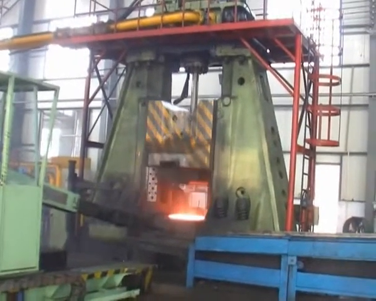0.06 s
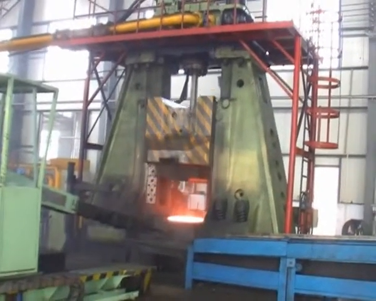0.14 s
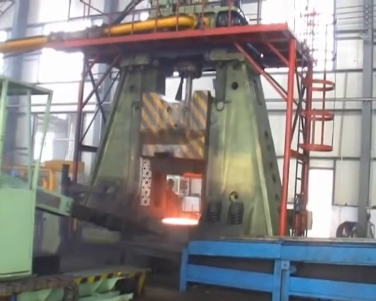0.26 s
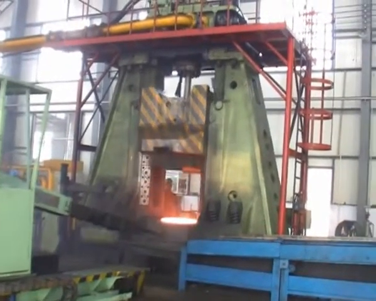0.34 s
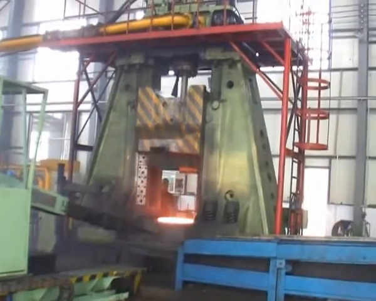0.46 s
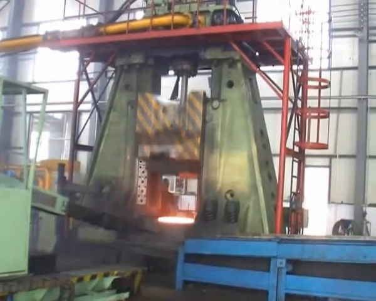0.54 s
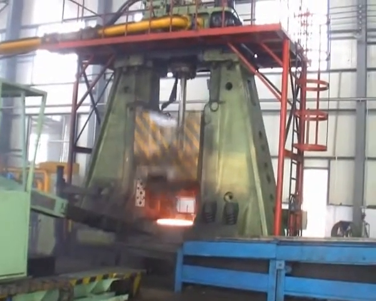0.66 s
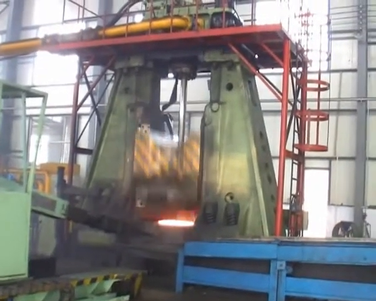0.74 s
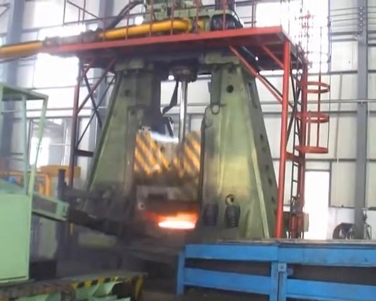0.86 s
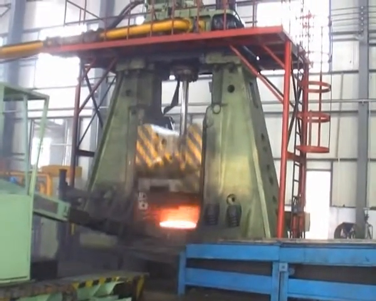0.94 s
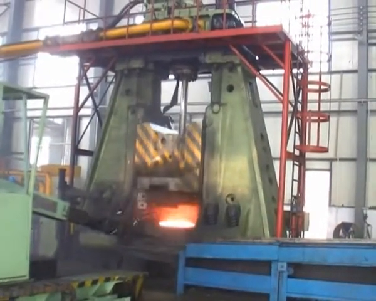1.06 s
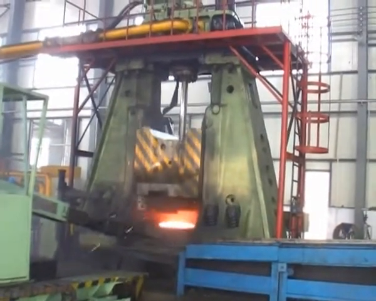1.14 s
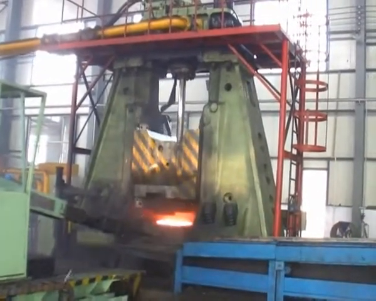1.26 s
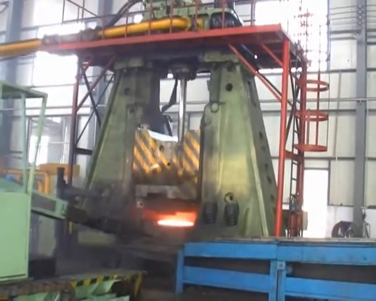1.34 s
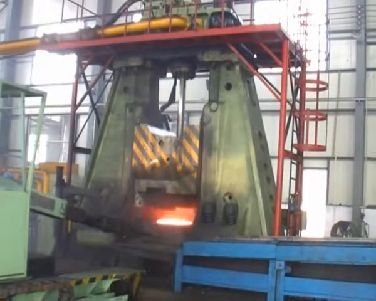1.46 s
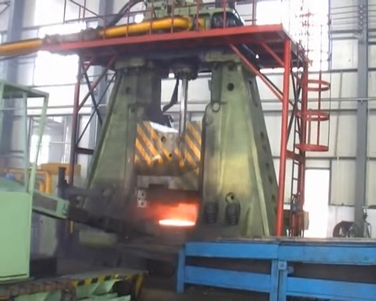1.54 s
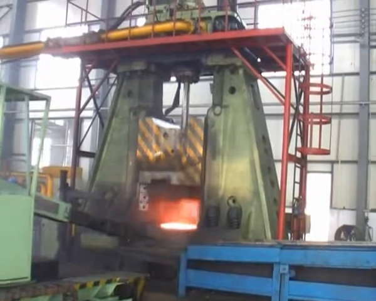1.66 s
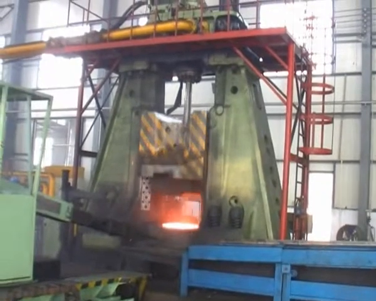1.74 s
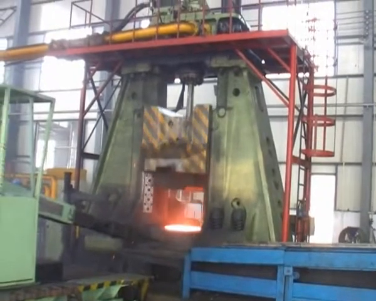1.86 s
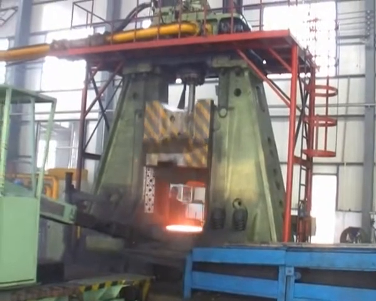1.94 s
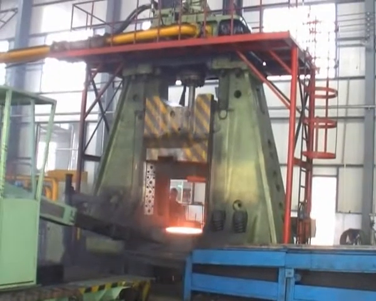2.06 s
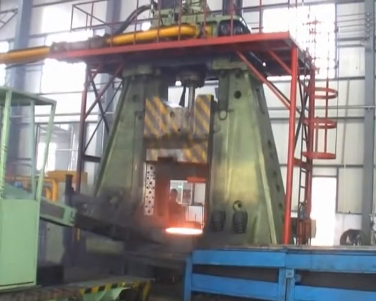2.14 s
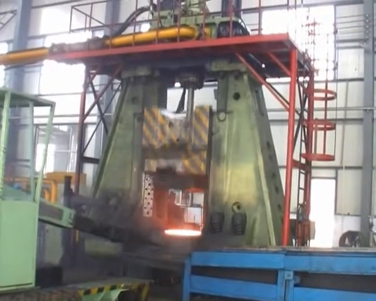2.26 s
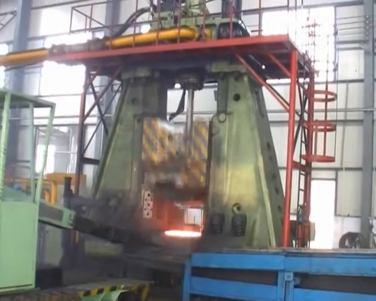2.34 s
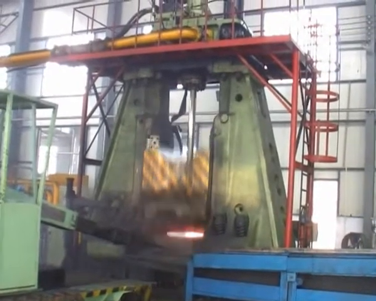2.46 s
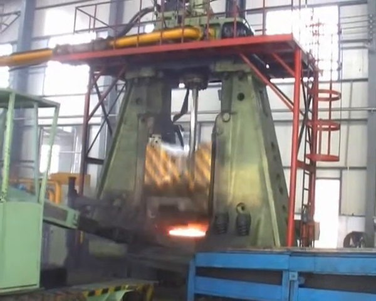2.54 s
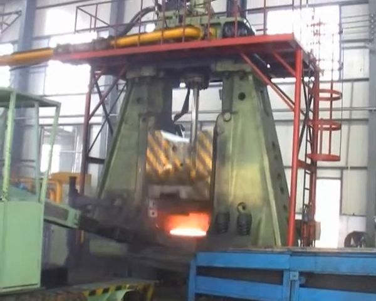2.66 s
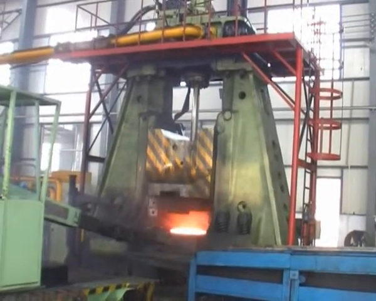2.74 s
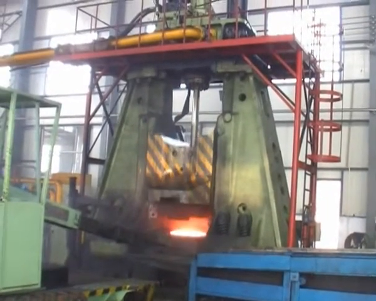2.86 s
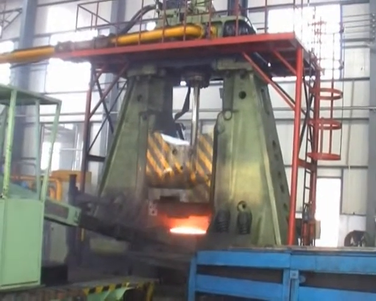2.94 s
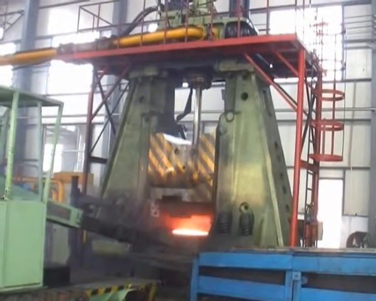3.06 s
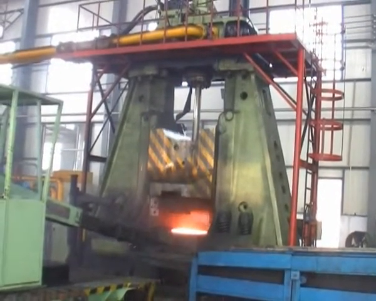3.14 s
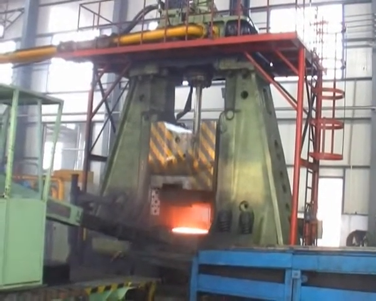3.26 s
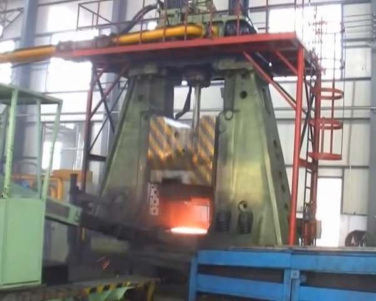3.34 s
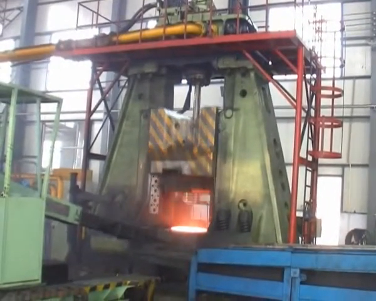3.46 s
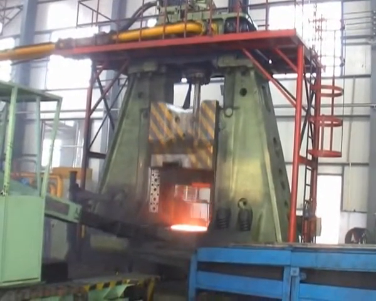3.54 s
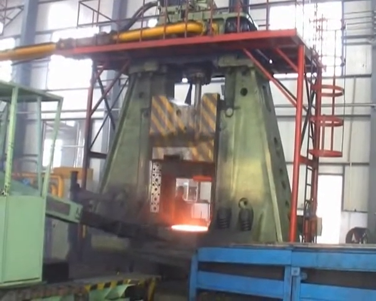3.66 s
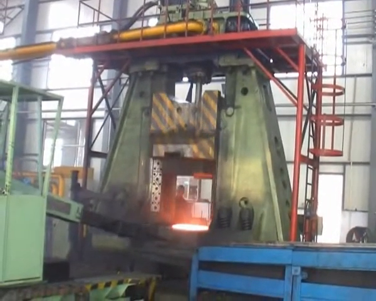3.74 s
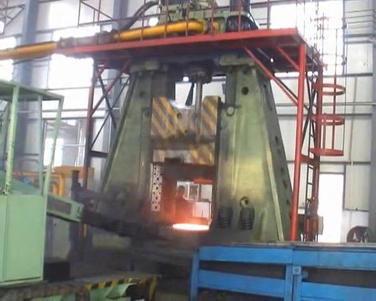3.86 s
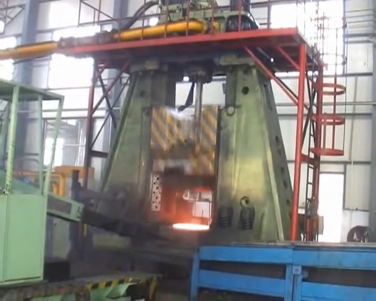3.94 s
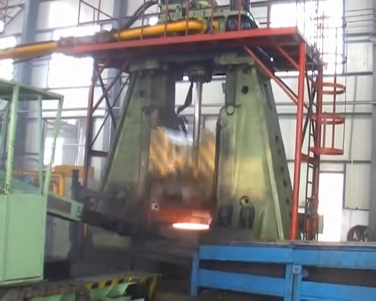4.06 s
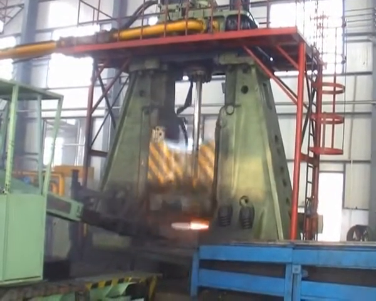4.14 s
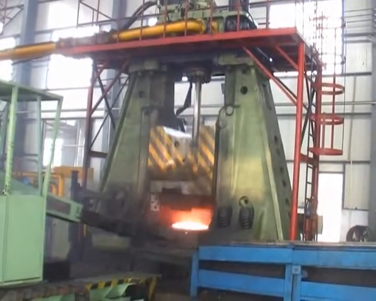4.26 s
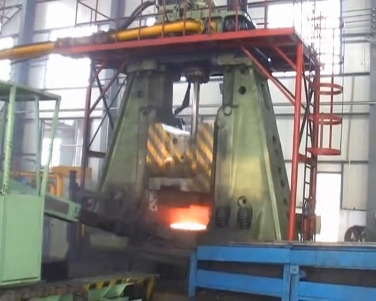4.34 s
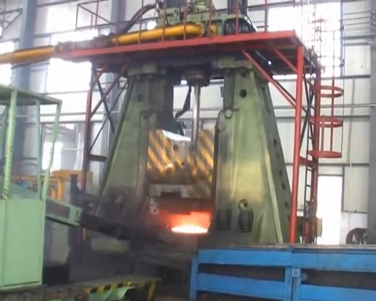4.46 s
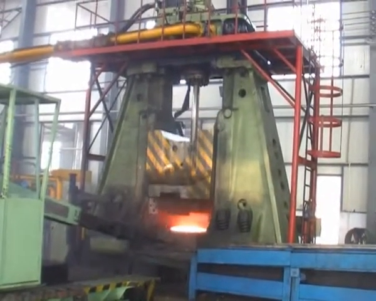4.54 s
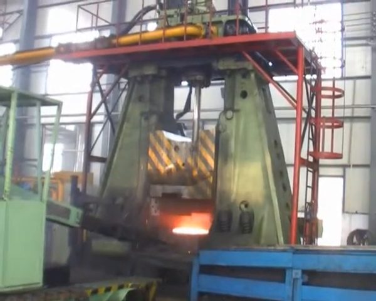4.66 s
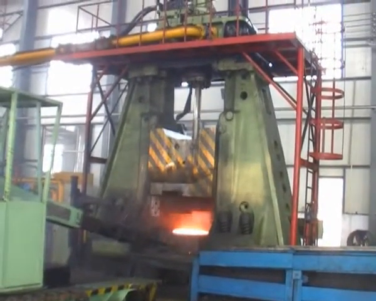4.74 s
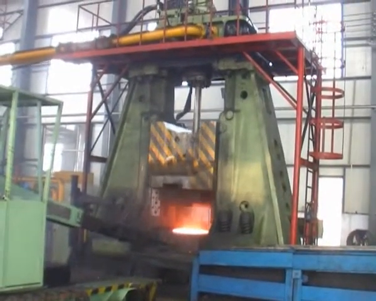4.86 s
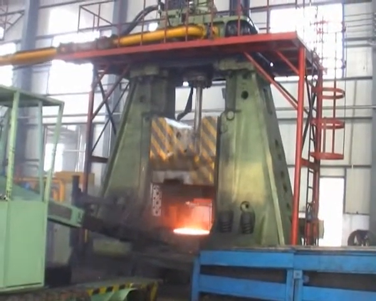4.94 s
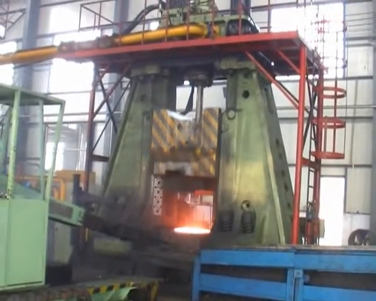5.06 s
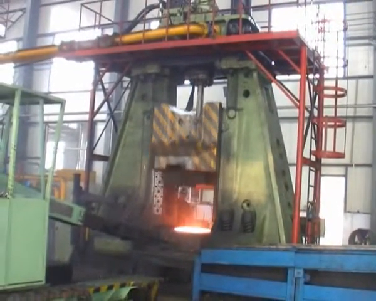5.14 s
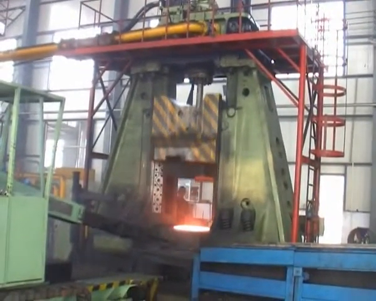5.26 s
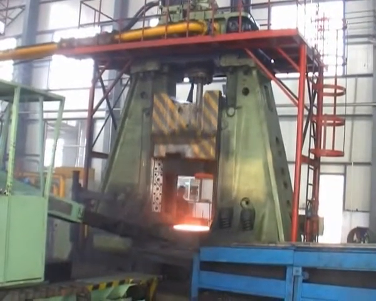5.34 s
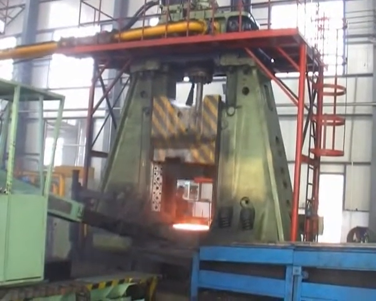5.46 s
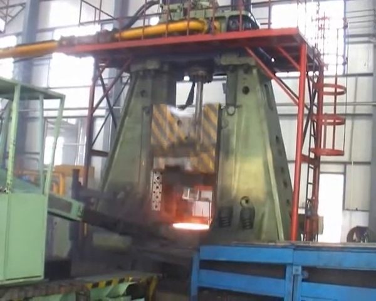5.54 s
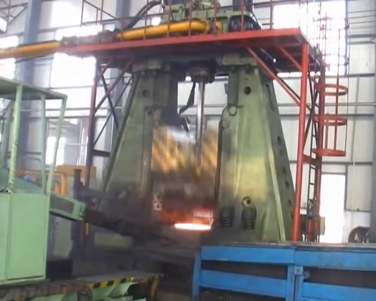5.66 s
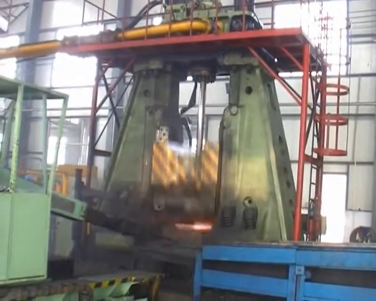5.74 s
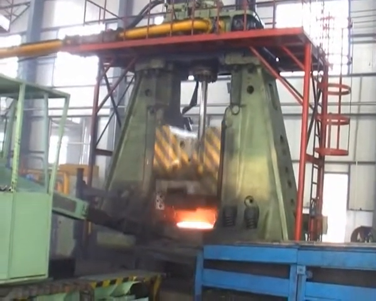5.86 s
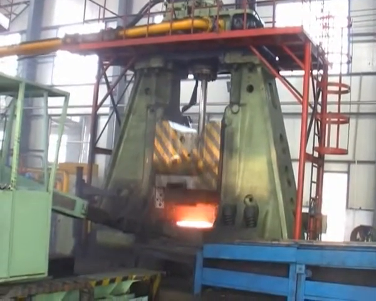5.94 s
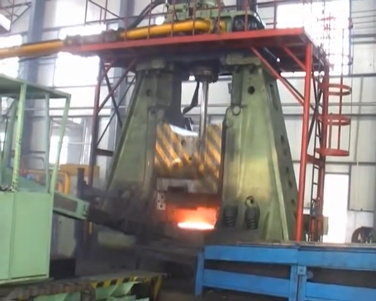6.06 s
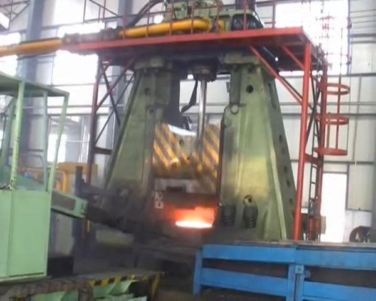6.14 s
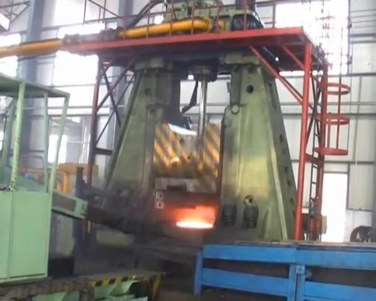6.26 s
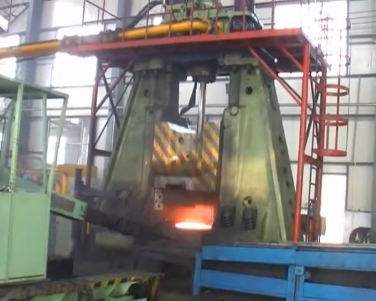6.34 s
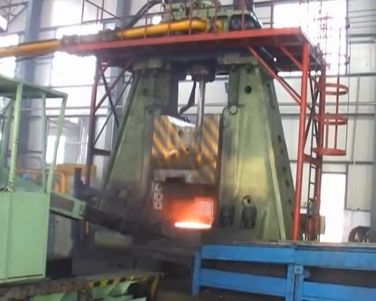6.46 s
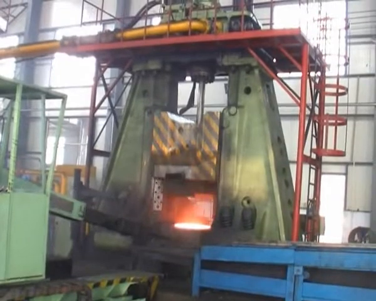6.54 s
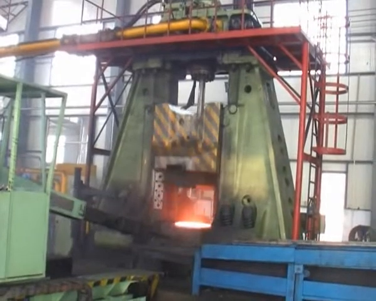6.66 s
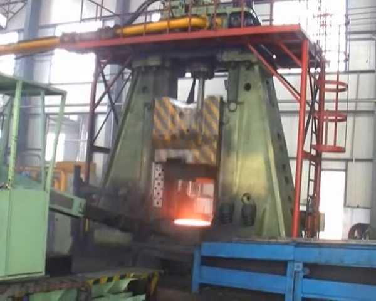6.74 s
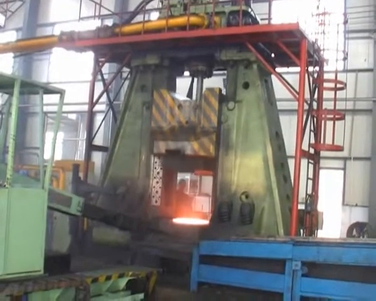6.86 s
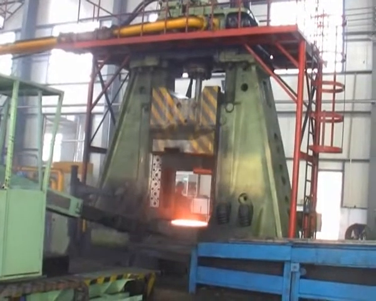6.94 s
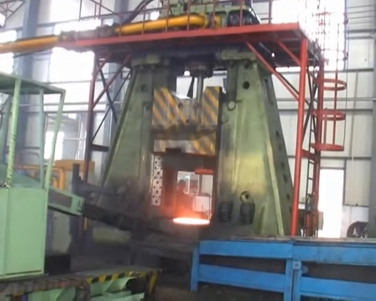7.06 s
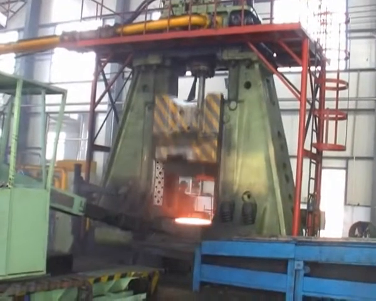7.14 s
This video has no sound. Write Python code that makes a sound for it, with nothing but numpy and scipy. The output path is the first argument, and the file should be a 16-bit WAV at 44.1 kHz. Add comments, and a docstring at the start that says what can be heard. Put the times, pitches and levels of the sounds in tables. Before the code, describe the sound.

A huge forging hammer strikes hot metal four times with loud ringing bangs, over pump drone and valve hiss in an echoing hall.

```python
"""Heavy hammer blows crack and ring through a big steel hall, about one every 1.65 s.
A hydraulic forging hammer strikes a hot billet: the dies meet, the frame rings and the hall roars.
Between blows the pumps drone, oil and air hiss through the valves, and dull low thuds sound.
An automatic gain control ducks at every blow and creeps back up."""
import sys
import numpy as np
from scipy import signal
from scipy.fft import rfft, irfft, next_fast_len
from scipy.io import wavfile

SR = 44100
rng = np.random.default_rng(int(sys.argv[2]) if len(sys.argv) > 2 else 0)


def dump_mix(stems):
    """Bounce the given channels to the path in sys.argv[1] as a 16-bit WAV at rate SR."""
    frames = np.atleast_2d(stems).T  # one column per channel
    limited = np.clip(frames, -1, 1)  # hard clip at full scale
    pcm = np.round(limited * 32767).astype(np.int16)
    wavfile.write(sys.argv[1], SR, pcm)


N = 317961
LEAD = SR  # 1 s of lead-in: an earlier blow still rings at time 0
TIME_S = np.arange(-LEAD, N) / SR
AGE_S = np.arange(3 * SR) / SR  # time since a blow
SIDES = np.array([[1], [-1]])  # left, right


def from_db(db):
    """Decibels to gain."""
    return 10 ** (np.asarray(db) / 20)


def at_hz(points, hz):
    """Interpolate a table on a log-frequency axis."""
    table_hz, value = np.transpose(points)
    return np.interp(np.log(np.maximum(hz, 1)), np.log(table_hz), value)


def white_pair(size):
    """Spectra of two independent white noises."""
    return rfft(rng.standard_normal((2, size)))


# Left-right likeness of the noises: (frequency [Hz], coherence [0..1])
STEREO_COHERENCE = [(60, .87), (300, .935), (1300, .93), (2800, .87), (6000, .84), (10000, .5)]
# Stereo balance of the noises: (frequency [Hz], left minus right [dB])
STEREO_BALANCE = [(100, 3.1), (400, .7), (1100, 0.4), (4000, 1.6), (6800, 3.1), (10000, .3)]
def coloured(white, spectrum):
    """Give a pair of noise spectra their colour and stereo image."""
    hz = np.linspace(0, SR / 2, white.shape[1])
    gain = from_db(at_hz(spectrum, hz))
    coherence = np.clip(at_hz(STEREO_COHERENCE, hz), 0, 1)
    mid = np.sqrt((1 + coherence) / 2) * white[0]
    side = np.sqrt((1 - coherence) / 2) * white[1]
    balance = from_db(SIDES * at_hz(STEREO_BALANCE, hz) / 2)
    return (mid + SIDES * side) * balance * gain / np.sqrt(np.mean(gain ** 2))


def noise(spectrum, size):
    """Steady stereo noise, rms about 1."""
    white = white_pair(2 * next_fast_len(size // 2 + 1))
    return irfft(coloured(white, spectrum))[:, :size]


def wavering_tone(hz, t, waver, waver_hz, spread):
    """A tone heard over many paths: amplitude and phase wander, slightly apart in left and right."""
    knots_s = np.arange(t[0], t[-1] + 1, 1 / waver_hz)
    common, apart = rng.standard_normal((2, len(knots_s), 2)) @ [1, 1j]
    paths = 1 + waver * common + spread * apart * SIDES
    paths /= np.sqrt(np.mean(np.abs(paths) ** 2))
    carrier = np.exp(2j * np.pi * (hz * t + rng.random()))
    return np.sqrt(2) * np.real([np.interp(t, knots_s, channel) * carrier for channel in paths])


# Pump and motor drone: (frequency [Hz], relative density [dB])
DRONE_SPECTRUM = [(30, -50), (60, -45), (110, -18.5), (180, -12.5), (230, -9), (340, -6), (450, -10.5),
                  (700, -14.5), (920, 0), (1600, -1), (2200, -6.5), (3200, -15), (5000, -19.5),
                  (12000, -66)]
# Pump tones: (frequency [Hz], level before load gain [dB], waver [ratio])
PUMP_PARTIALS = [(227, -50, .8), (320, -45, .9), (347.5, -41.5, .45), (388, -49, .8), (522, -50.5, .5),
                 (695, -44.5, .55), (1007, -42, .7), (1080, -43, .7), (1620, -44, .9)]
# Pump load: (time [s], gain [dB])
LOAD_CURVE = [(0.5, 1.2), (2.3, 0.36), (3.9, 1), (5.5, 1.4), (7.1, 2)]
def pumps(drone_db, waver_hz, spread):
    """Hydraulic power pack: a broad drone with wavering tones, louder under load."""
    tones = sum(from_db(db) * wavering_tone(hz, TIME_S, waver, waver_hz, spread)
                for hz, db, waver in PUMP_PARTIALS)
    drone = from_db(drone_db) * noise(DRONE_SPECTRUM, len(TIME_S))
    load_db = np.interp(TIME_S, *np.transpose(LOAD_CURVE))
    return from_db(load_db) * (drone + tones)


# Low thuds between blows: (time [s], envelope peak [dB])
LOW_THUDS = [(0.24, -45), (1.24, -47), (3.235, -37), (4.5, -40), (6.235, -29)]
def thuds(hz, half_width_s):
    """Dull thuds: a slow swing or two under a Gaussian envelope."""
    out = np.zeros(len(TIME_S))
    for time_s, db in LOW_THUDS:
        t = TIME_S - time_s
        out += from_db(db) * np.exp(-(t / half_width_s) ** 2) * np.sin(2 * np.pi * hz * t)
    return out


# Valve hiss: (frequency [Hz], relative density [dB])
HISS_SPECTRUM = [(1500, -40), (4000, -18), (5500, -5), (6300, 1.5), (7000, 2.5), (8500, -2), (10000, -5),
                 (11400, -16.5), (12600, -40)]
# Ram lifts: (time [s], hiss level [dB], power decay constant [s], reversal level [dB])
RAM_LIFTS = [(0.05, -33.5, 0.94, -31.5), (1.645, -35.5, 0.69, -29.5), (3.5, -28, 0.35, -30),
             (5.13, -28, 0.22, -30), (6.6, -35, 0.086, -27)]
def valves(steady_db, opening_s, puff_db, reversal_after_s, spurt_lead_s, flutter_db, flutter_hz):
    """Oil and air pass the valves: a narrow bright hiss that follows the ram's stroke."""
    def surge(time_s, db, half_width_s):
        return from_db(db) ** 2 * np.exp(-((TIME_S - time_s) / half_width_s) ** 2)
    power = from_db(steady_db) ** 2
    for lift_s, db, decay_s, reversal_db in RAM_LIFTS:
        opening = (1 + np.tanh((TIME_S - lift_s) / opening_s)) / 2
        fade = np.exp(-np.maximum(TIME_S - lift_s, 0) / decay_s)
        power += from_db(db) ** 2 * opening * fade
        power += surge(lift_s, puff_db, half_width_s=0.028)  # valve cracks open
        power += surge(lift_s + reversal_after_s, reversal_db, half_width_s=0.094)  # top of stroke
    for blow_s, spurt_db in RAM_BLOWS:
        power += surge(blow_s - spurt_lead_s, spurt_db, half_width_s=0.031)  # ram comes down
    hiss = np.sqrt(power) * noise(HISS_SPECTRUM, len(TIME_S))
    knots_s = np.arange(TIME_S[0], TIME_S[-1] + 1, 1 / flutter_hz)
    flutter = np.interp(TIME_S, knots_s, rng.standard_normal(len(knots_s)))
    return hiss * from_db(flutter_db * flutter)


# Hall response to a blow: (frequency [Hz], relative density [dB])
ROAR_SPECTRUM = [(30, -36), (60, -34), (100, -14), (180, -9.5), (330, -3.5), (500, -7), (730, -6.5),
                 (940, 2.5), (1250, -3), (1600, -2.5), (3000, -8.5), (5000, -11.5), (6800, -7.5),
                 (10000, -14.5), (13500, -34)]
# Hall decay: (band centre [Hz], T60 [s])
HALL_DECAY = [(60, 1.53), (250, 2.41), (500, 2.05), (1000, 2.57), (2000, 2.85), (4000, 1.966), (7000, 1.19),
              (11000, 0.48)]
def hall_roar(white, level_db, first_wall_s, early_share, build_cycles):
    """Dense reflections swell when the first wall answers; bass blooms late, treble dies first."""
    spectrum = coloured(white, ROAR_SPECTRUM)
    hz = np.linspace(0, SR / 2, spectrum.shape[1])
    out = np.zeros((2, len(AGE_S)))
    for centre_hz, t60_s in HALL_DECAY:
        band = at_hz([(f, f == centre_hz) for f, _ in HALL_DECAY], hz)
        build = 1 - np.exp(-AGE_S * centre_hz / build_cycles)
        out += irfft(spectrum * band) * from_db(-60 * AGE_S / t60_s) * build
    wall_onset = (1 + np.tanh((AGE_S - first_wall_s) / 0.0014)) / 2
    swell = early_share + (1 - early_share) * wall_onset
    return from_db(level_db) * swell * out


# Modes of dies, anvil and frame: (frequency [Hz], relative level [dB], T60 [s], build-up [s])
STEEL_MODES = [(115, -35, 2.4, .06), (163, -29, 1.4, .02), (213, -27, 2, .03), (290, -22, 1.2, .13),
               (324, -16, 1.5, .15), (350, -21, 1.4, .15), (387, -24, 1.8, .06), (559, -23, 2.6, .03),
               (664, -22, 1.4, .02), (812, -23, 1.6, .02), (847, -22, 2.2, .02), (928, -20, 1.4, .02),
               (952, -17, 2.1, .02), (1008, -11, 1.7, .02), (1106, -13.5, 1.2, .02), (1235, -7, .09, .001),
               (1422, -15, 1.2, .02), (1524, -23, 1.2, .02), (1604, -23, 2.6, .05), (1624, -19, 1, .02),
               (2017, -22, 1, .01), (2880, -12, .12, .001), (3450, -15, .1, .001), (3947, -27, .7, .005),
               (4647, -27, .8, .005), (6567, -22, .4, .001)]
def frame_ring(level_db, waver, waver_hz, spread):
    """Steel modes build up as the blow spreads through the frame, then die away."""
    out = np.zeros((2, len(AGE_S)))
    for hz, db, t60_s, build_s in STEEL_MODES:
        t = AGE_S[:int(t60_s * SR)]
        build = 1 - np.exp(-(t / build_s) ** 2)
        envelope = from_db(db - 60 * t / t60_s) * build
        out[:, :len(t)] += envelope * wavering_tone(hz, t, waver, waver_hz, spread)
    return from_db(level_db) * out


# Direct crack of the dies: (frequency [Hz], relative density [dB])
CRACK_SPECTRUM = [(30, -34), (80, -26), (170, -7.5), (500, 0), (1100, -1.5), (2000, 1), (3200, -3),
                  (4700, -16), (6600, 0), (9500, -17), (13500, -39)]
def die_crack(level_db, decay_s):
    """The dies meet: a short noise burst straight from the anvil."""
    return from_db(level_db) * noise(CRACK_SPECTRUM, len(AGE_S)) * np.exp(-(AGE_S / decay_s) ** 2)


# Ram blows: (time [s], level of the valve spurt just ahead [dB])
RAM_BLOWS = [(-0.75, -27), (0.9318, -26.5), (2.6495, -27), (4.2675, -23), (5.888, -28.5)]
def hammer(shared_power):
    """Each blow repeats one crack and ring; its roar changes a little as the billet flattens."""
    out = np.zeros((2, len(TIME_S)))
    shared = white_pair(len(AGE_S))
    crack = die_crack(level_db=-2.5, decay_s=0.012)
    ring = frame_ring(level_db=0.5, waver=0.42, waver_hz=13, spread=0.14)
    for blow_s, _ in RAM_BLOWS:
        white = np.sqrt(shared_power) * shared + np.sqrt(1 - shared_power) * white_pair(len(AGE_S))
        roar = hall_roar(white, level_db=-1.0, first_wall_s=0.0142, early_share=0.47, build_cycles=3.9)
        blow = crack + ring + roar
        start = LEAD + round(blow_s * SR)
        out[:, start:start + len(AGE_S)] += blow[:, :len(TIME_S) - start]
    return out


def scene():
    """Pumps, thuds, valves and hammer in stereo, lead-in included."""
    drone = pumps(drone_db=-24.0, waver_hz=5.4, spread=0.092)
    lows = thuds(hz=38, half_width_s=0.014)
    hiss = valves(steady_db=-33.0, opening_s=0.036, puff_db=-31, reversal_after_s=0.58,
                  spurt_lead_s=0.061, flutter_db=0.9, flutter_hz=22)
    return drone + lows + hiss + hammer(shared_power=0.53)


def gain_control(x, limit_db, depth_db, window_s, attack_s, release_db_per_s):
    """Duck by the excess over the limit, at most depth_db; recover at the release rate."""
    def smooth(values, tau_s):
        pole = np.exp(-1 / (tau_s * SR))
        return signal.lfilter([1 - pole], [1, -pole], values)
    level_db = 10 * np.log10(smooth(np.mean(x ** 2, axis=0), window_s) + 1e-12)
    excess_db = np.clip(level_db - limit_db, 0, depth_db)
    ramp_db = release_db_per_s * np.arange(x.shape[1]) / SR
    reduction_db = np.maximum.accumulate(excess_db + ramp_db) - ramp_db  # falling peak hold
    return x * from_db(-smooth(reduction_db, attack_s))


def record(dry):
    """Slow-release gain control, shallow peak limiter, clipping, bass and top cuts; drops the lead-in."""
    ducked = gain_control(dry, limit_db=-9.5, depth_db=18,
                          window_s=0.0047, attack_s=0.0018, release_db_per_s=12.5)
    limited = gain_control(ducked, limit_db=-6.5, depth_db=4,
                           window_s=0.00002, attack_s=0.00004, release_db_per_s=1200)
    clipped = np.clip(limited, -0.74, 0.74)
    bass_cut_hz, top_cut_hz = 58, 13600
    bass_cut = signal.butter(2, bass_cut_hz, "high", fs=SR, output="sos")
    top_cut = signal.ellip(12, 0.1, 100, top_cut_hz, fs=SR, output="sos")
    return signal.sosfilt(top_cut, signal.sosfilt(bass_cut, clipped))[:, -N:]


dry = scene()
out = record(dry)
dump_mix(out)
```